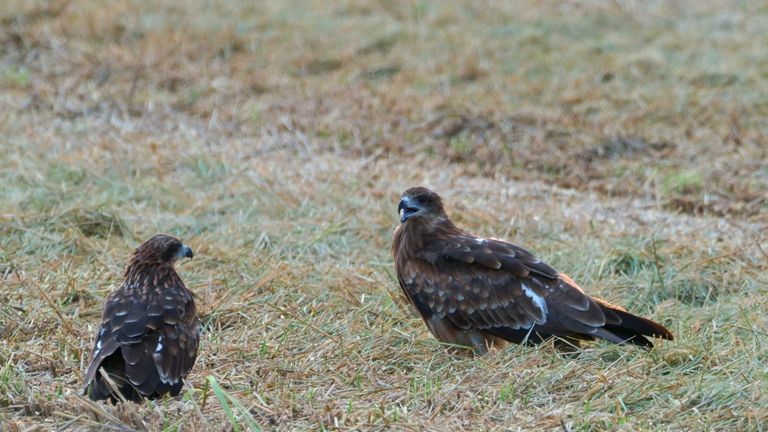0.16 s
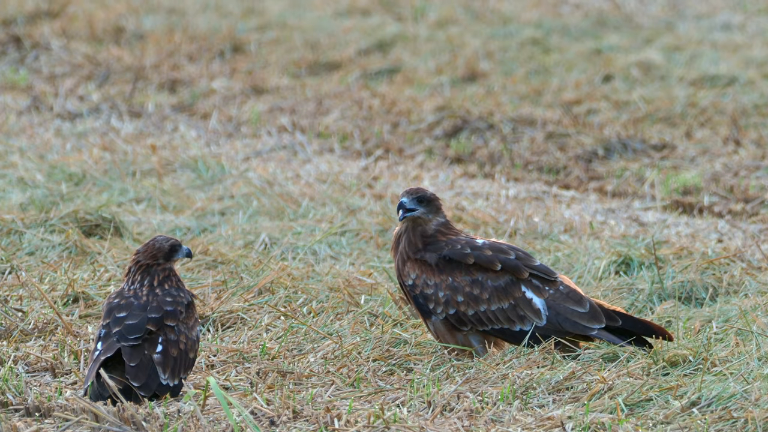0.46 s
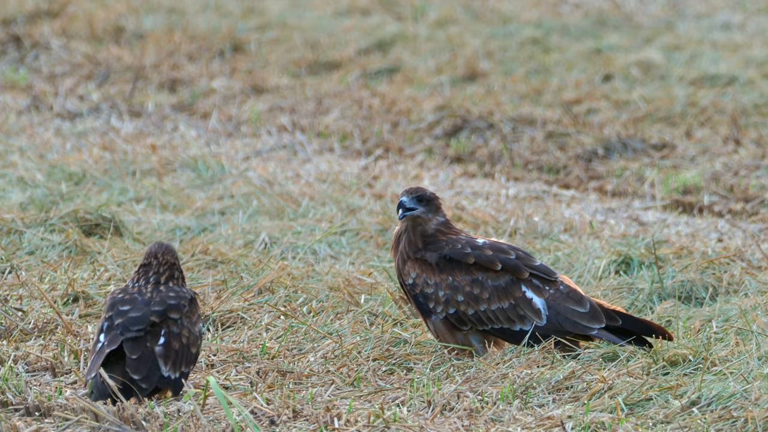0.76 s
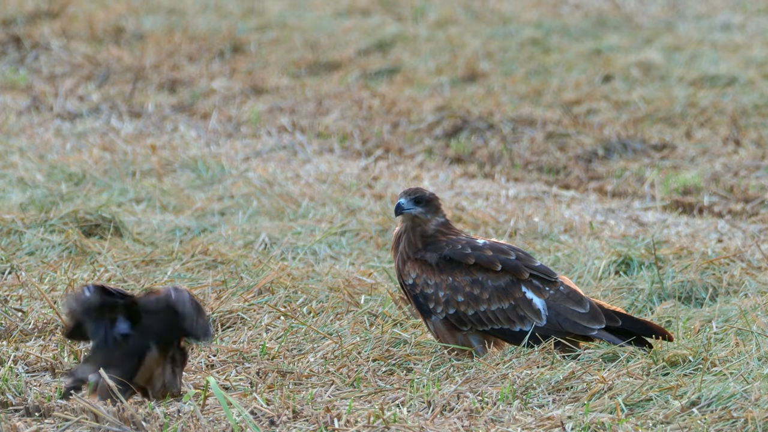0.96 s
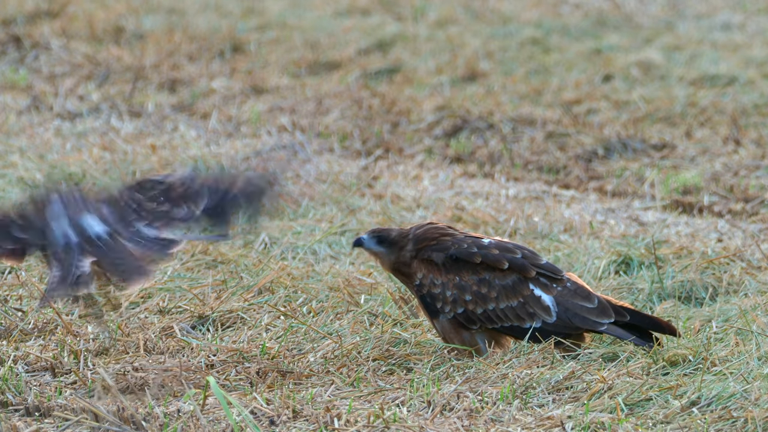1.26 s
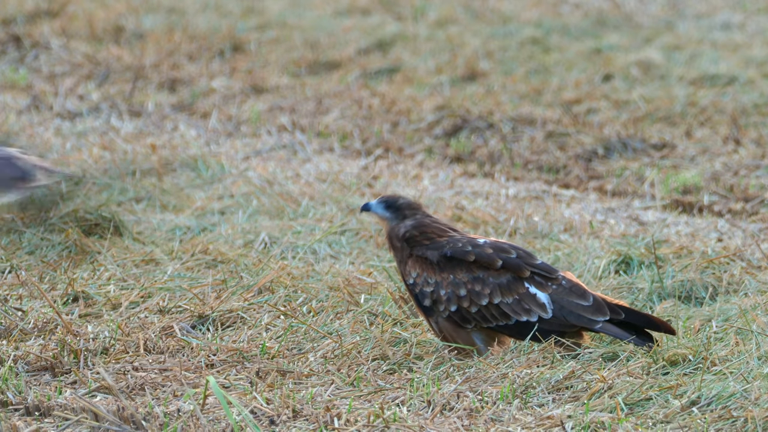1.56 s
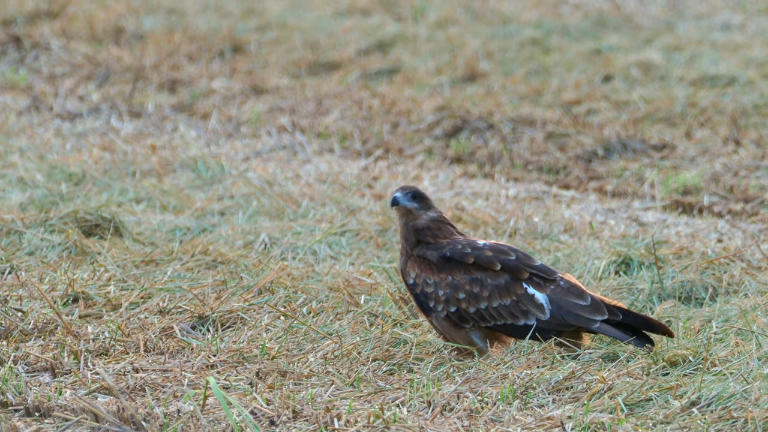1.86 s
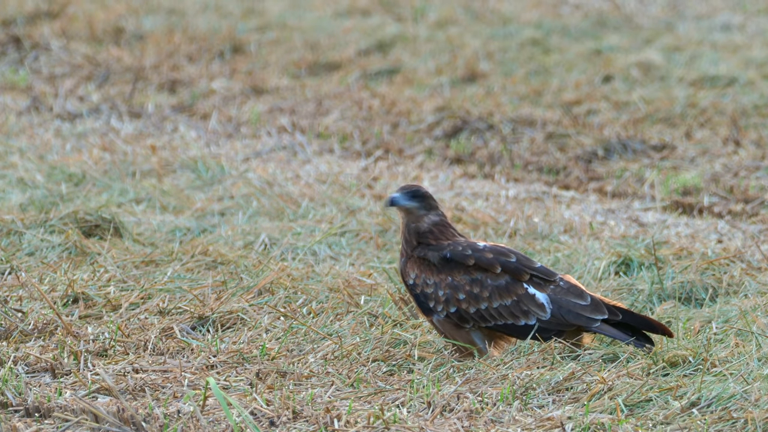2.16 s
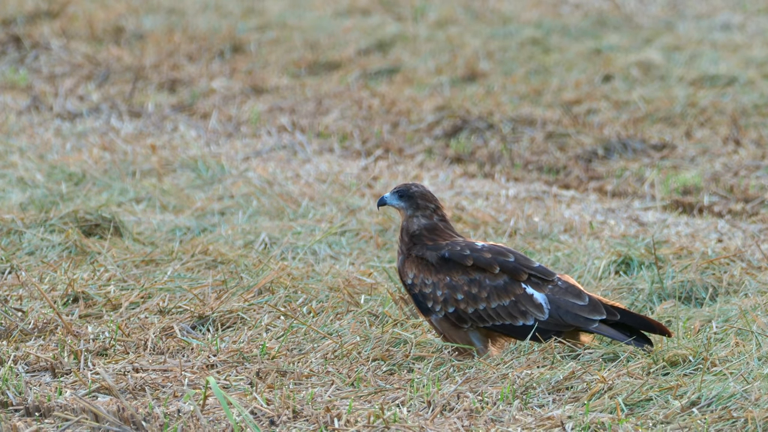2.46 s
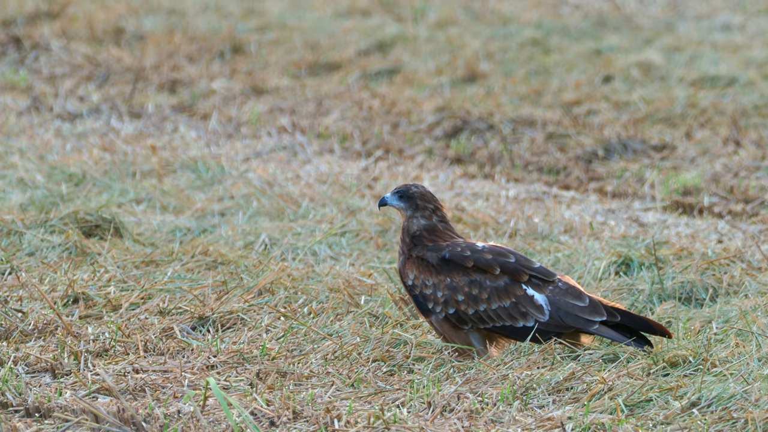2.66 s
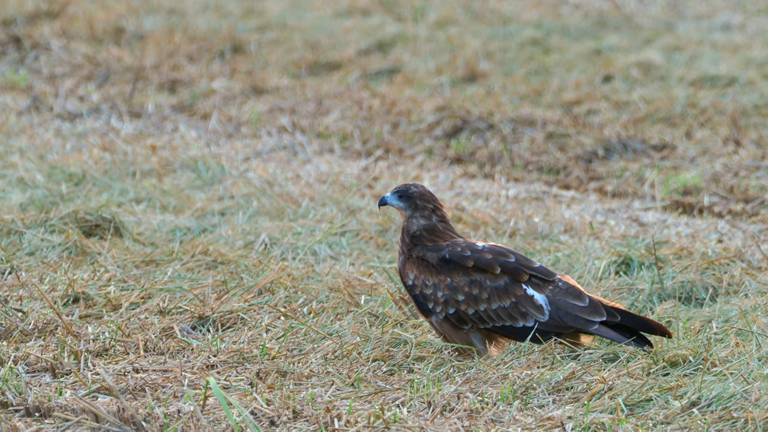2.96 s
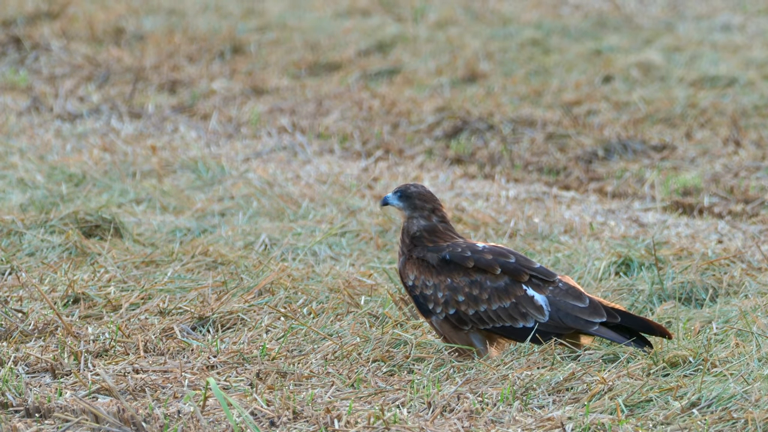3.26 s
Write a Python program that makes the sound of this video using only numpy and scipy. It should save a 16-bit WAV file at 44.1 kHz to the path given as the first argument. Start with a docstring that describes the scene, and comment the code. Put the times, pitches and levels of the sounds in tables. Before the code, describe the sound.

In an open field, a bird of prey in front of the microphone lets out one high, raspy whistle that clears, quavers and fades. Two faraway engines hum beneath it, and a low outdoor rumble continues afterward.

```python
"""A black kite over a mown field

The bird gives one long thin whistle: hoarse at first, then clear, ending in a slow quaver.
The whistle is a few pure tones; the hoarseness is rough, rushing air with a few hollow peaks.
Two far engines drone and drift in pitch over a low outdoor rumble and a faint even hiss."""
import sys
import numpy as np
from scipy import signal
from scipy.fft import rfft, irfft
from scipy.io import wavfile
from scipy.ndimage import uniform_filter1d

SR = 44100
rng = np.random.default_rng(int(sys.argv[2]) if len(sys.argv) > 2 else 0)


def inscribe(sig):
    """Save sig as 16-bit PCM at rate SR to the path in sys.argv[1].

    A 1-D sig is mono; a 2-D sig holds one channel per row.
    Samples are clipped to [-1, 1] before scaling.
    """
    pcm = np.round(np.clip(np.atleast_2d(sig).T, -1, 1) * 32767)
    wavfile.write(sys.argv[1], SR, pcm.astype(np.int16))


N = 150822
TIME = np.arange(N) / SR
FREQUENCIES = np.fft.rfftfreq(N, 1 / SR)
CUTOFF_HZ = 15700


def from_db(db):
    """Turn decibels into a number to multiply a sound by."""
    return 10 ** (np.asarray(db) / 20)


def rms_one(x):
    """Scale a signal so that its average strength (rms) is 1."""
    return x / np.sqrt(np.mean(x ** 2) + 1e-20)


def in_time(rows):
    """Join a table's points in time with straight lines: one curve for each column after the first."""
    times, *columns = np.transpose(rows)
    return [np.interp(TIME, times, column) for column in columns]


def across_frequencies(rows):
    """Join a table's points from bass to treble, giving each octave equal room."""
    hz, values = np.transpose(rows)
    return np.interp(np.log(FREQUENCIES + 1e-9), np.log(hz), values)


def pan(db):
    """Left and right gains: positive dB moves a sound left, negative moves it right."""
    return from_db([[db / 2], [-db / 2]])


def drift(rate):
    """A smooth random wobble of size about 1 that changes about `rate` times a second."""
    return rms_one(irfft(rfft(rng.standard_normal(N)) / (1 + (FREQUENCIES / rate) ** 2), N))


def keep_band(x, hz, width_hz):
    """Keep a band around one frequency, filtering twice for steep sides."""
    r = np.exp(-np.pi * width_hz / SR)
    gain = (1 - r * r) / 2
    stage = [gain, 0, -gain, 1, -2 * r * np.cos(2 * np.pi * hz / SR), r * r]
    return signal.sosfilt([stage, stage], x)


def phase_of(hz):
    """Add up a changing pitch into the angle of a sine wave."""
    return 2 * np.pi * np.cumsum(hz) / SR


# how alike the two ears hear the noise, 1 being the same: (frequency [Hz], likeness [-1 to 1])
EAR_LIKENESS = [(30, .985), (120, 0.97), (300, 0.66), (700, 0.78), (1300, 0.58), (3000, 0.036),
                (5500, -0.014), (15000, -0.055)]
# which side the noise leans to: (frequency [Hz], left minus right [dB])
EAR_BALANCE = [(40, -0.5), (120, -0.8), (330, -2.5), (700, -1), (1400, -1.8), (2600, -0.5), (3900, -2),
               (5000, -2.5), (7500, -0.5), (10000, 1.3), (11500, 1), (13800, -5), (15300, 1.3)]

def wide_noise(colour):
    """Noise from all around: alike in both ears in the bass, unrelated in the treble."""
    shared, opposed = rfft(rng.standard_normal((2, N)))
    alike = across_frequencies(EAR_LIKENESS)
    sides = np.array([[1], [-1]])
    ears = np.sqrt(1 + alike) * shared + np.sqrt(1 - alike) * opposed * sides
    gain = from_db(across_frequencies(colour) + sides * across_frequencies(EAR_BALANCE) / 2)
    in_range = (FREQUENCIES > 10) & (FREQUENCIES < CUTOFF_HZ)
    return rms_one(irfft(ears * gain * in_range, N))


# the tone colour of the low rumble: (frequency [Hz], relative level [dB])
RUMBLE_COLOUR = [(10, -8), (22, 2), (40, -5), (60, -10.5), (90, -10.5), (125, -21), (180, -13), (250, -26),
                 (400, -33), (800, -57)]
# how the rumble swells and sinks: (time [s], level [dB])
RUMBLE_LOUDNESS = [(0, -51), (.3, -47), (.9, -47.5), (1.3, -47.5), (1.85, -48), (2.3, -51.5), (3.42, -51.5)]
# the tone colour of distant traffic and hiss: (frequency [Hz], relative level [dB])
HUSH_COLOUR = [(100, -5.5), (280, 1), (420, -3), (560, -5), (760, -1.5), (930, -10), (1100, -7), (1500, -8),
               (1800, -18.5), (2300, -14.5), (2900, -12.5), (3900, -14.5), (4400, -20), (6200, -18.5),
               (8200, -24), (10200, -20), (11300, -27.5), (13300, -21.5), (14400, -25.5), (15600, -23)]

def open_field(hush_db=-61.5, insect_db=-85.5):
    """Low rumble, the even hush of distant traffic and a faint thin band of insects on the right."""
    rumble_db, = in_time(RUMBLE_LOUDNESS)
    insects = rms_one(keep_band(rng.standard_normal(N), hz=6020, width_hz=110))
    rumble = from_db(rumble_db) * wide_noise(RUMBLE_COLOUR)
    hush = from_db(hush_db) * wide_noise(HUSH_COLOUR)
    return rumble + hush + pan(-11) * from_db(insect_db) * insects


# the nearer engine's note: (time [s], pitch [Hz], level [dB])
NEARER_NOTE = [(0, 224.6, -63), (.46, 220.9, -59.5), (1.1, 212.5, -58.5), (1.79, 204.1, -55),
               (2.2, 205.3, -54.5), (2.55, 206.9, -58), (2.94, 210.1, -54.5), (3.42, 212.3, -54)]
# the tones in its drone: (frequency [times the pitch], relative level [dB])
NEARER_TONES = [(.25, -4), (.5, -10), (1, -1.5), (2, -22)]
# the farther engine's note, which dies away: (time [s], pitch [Hz], level [dB])
FARTHER_NOTE = [(0, 168.1, -69), (.51, 165.1, -58.5), (1.14, 158.7, -57.5), (1.74, 154.5, -58),
                (1.86, 147, -80), (3.42, 143.8, -74)]
# the tones in its drone: (frequency [times the pitch], relative level [dB])
FARTHER_TONES = [(.5, -2.4), (1, -1.4)]

def engine(note, tones, waver_hz, fading_db):
    """A far drone, a little to the right, whose tones swell and fade on their way through the air."""
    hz, level_db = in_time(note)
    phase = phase_of(hz + waver_hz * drift(8))
    drone = np.zeros(N)
    for multiple, db in tones:
        strength = from_db(db + fading_db * drift(13))
        drone += strength * np.sin(multiple * phase + rng.uniform(0, 2 * np.pi))
    return pan(-2.3) * np.sqrt(2) * from_db(level_db) * drone


def from_the_right(x, lag_s=0.00008):
    """Sound from the right reaches the left ear a little late."""
    left, right = x
    delay = np.exp(-2j * np.pi * FREQUENCIES * lag_s)
    return np.array([irfft(rfft(left) * delay, N), right])


# the tone colour of the bird's airy hiss: (frequency [Hz], relative level [dB])
HISS_COLOUR = [(300, -8), (600, -3.5), (1100, -2.5), (2050, -10.5), (2400, -1.5), (2950, 2.5), (4100, -6.5),
               (5500, -6.5), (7400, -4.5), (8300, -10), (10200, -7), (11300, -15.5), (13400, -7),
               (15700, -15)]
# how that hiss fades: (time [s], level [dB])
HISS_LOUDNESS = [(0, -55.5), (.14, -58), (.25, -59), (.35, -62), (.43, -67), (.62, -76), (.8, -84),
                 (1.1, -115)]

def airy_hiss():
    """A bright hiss that opens the call and soon dies."""
    level_db, = in_time(HISS_LOUDNESS)
    return from_db(level_db) * wide_noise(HISS_COLOUR)


# how loud the hoarseness is: (time [s], level [dB])
RASP_LOUDNESS = [(0, -59), (.1, -58.5), (.25, -56), (.34, -59), (.46, -63.5), (.56, -62), (.66, -62.5),
                 (.75, -75.5), (1.05, -78), (1.2, -110)]
# the bands where the hoarse rasp is strongest: (frequency [Hz], width [Hz], relative level [dB])
RASP_BANDS = [(715, 270, -5.5), (1247, 114, -4), (1410, 215, 3.5), (2460, 210, -6.5), (3130, 400, -14)]

def rasp(flutter_db=0.3):
    """Rough, rushing air with a few hollow peaks and a slight flutter."""
    level_db, = in_time(RASP_LOUDNESS)
    rush = rng.standard_normal(N) + 0.11 * rng.standard_normal((2, N))  # nearly alike in both ears
    rush *= from_db(flutter_db * drift(66))
    peaks = sum(from_db(db) * keep_band(rush, hz, width) for hz, width, db in RASP_BANDS)
    return from_db(level_db) * rms_one(peaks)


# the whistle's tune: (time [s], pitch [Hz])
WHISTLE_TUNE = [(0, 1776), (.02, 1830), (.06, 1912), (.13, 1949), (.26, 1929), (.46, 1858), (.645, 1907),
                (.69, 1840), (.74, 1895), (.756, 1839), (.8, 1867), (.868, 1896), (.88, 1803), (.908, 1780),
                (.945, 1908), (.957, 1795), (.982, 1782), (1.018, 1894), (1.1, 1823), (1.17, 1780)]
# how hard the bird whistles: (time [s], level [dB])
WHISTLE_EFFORT = [(0, -68), (.05, -59), (.14, -57.5), (.26, -62), (.34, -60), (.46, -61.5), (.63, -64.5),
                  (.69, -63), (.85, -63), (.97, -66), (1.04, -67), (1.1, -78), (1.17, -94), (1.21, -115)]
# the tones at 1, 2, 3 and 4 times the pitch: (relative level [dB], share of the effort's swing [0 to 1],
# left minus right [dB], gain as the pitch rises [dB per 100 Hz])
WHISTLE_TONES = [(-8, 0.36, -2.5, 3.5), (1, 0.95, -2.5, -1.5), (-19, 0.23, -11.5, 9), (-23, 0.9, 14, 4)]
# the extra tones of the split voice, at 0.5, 1.5 and 2.5 times the pitch: (level [dB])
SPLIT_TONES = [-69.5, -60, -82]

def whistle(usual_effort_db=-61.5, shimmer_db=1.0, split_at_s=0.16, split_width_s=0.084, flicker_db=2.0):
    """A nearly pure voice led by its second tone; it splits early on and brightens atop each quaver."""
    pitch, = in_time(WHISTLE_TUNE)
    effort_db, = in_time(WHISTLE_EFFORT)
    tremble = 1 + 0.0019 * drift(84)
    phase = phase_of(uniform_filter1d(pitch, size=300) * tremble)
    rise_hz = np.minimum(pitch - 1870, 20)  # the voice stops brightening at 1890 Hz
    voice = np.zeros((2, N))
    for multiple, (db, share, pan_db, db_per_100_hz) in enumerate(WHISTLE_TONES, 1):
        level_db = usual_effort_db + db + share * (effort_db - usual_effort_db)
        level_db += db_per_100_hz * rise_hz / 100
        level_db += shimmer_db * drift(27)
        voice += pan(pan_db) * from_db(level_db) * np.sin(multiple * phase)
    split = np.exp(-0.5 * ((TIME - split_at_s) / split_width_s) ** 2)  # a brief bell-shaped swell
    for k, db in enumerate(SPLIT_TONES):
        voice += split * from_db(db + flicker_db * drift(25)) * np.sin((k + 0.5) * phase)
    end_s = WHISTLE_EFFORT[-1][0]
    return np.sqrt(2) * voice * (TIME < end_s)


# echoes from the field's edge: (delay [s], left level [dB], right level [dB])
EDGE_ECHOES = [(.019, -26, -31), (.043, -25, -33)]

def field_echoes(call, tail_db=-15.5, tail_s=0.44):
    """The call arrives directly, then as two echoes and a faint scattered tail."""
    heard = call.copy()
    for delay_s, left_db, right_db in EDGE_ECHOES:
        echo = np.interp(TIME - delay_s, TIME, call.mean(axis=0), left=0)
        heard += from_db([[left_db], [right_db]]) * echo
    scatter = rng.standard_normal((2, SR)) * from_db(-60 * TIME[:SR] / tail_s)
    tail = signal.fftconvolve(call, rms_one(scatter) / np.sqrt(SR), axes=1)[:, :N]
    return heard + from_db(tail_db) * tail


def scene():
    """The kite is straight ahead; the engines and rumble lie a little to the right."""
    nearer = engine(NEARER_NOTE, NEARER_TONES, waver_hz=0.43, fading_db=0.5)
    farther = engine(FARTHER_NOTE, FARTHER_TONES, waver_hz=2.5, fading_db=2.0)
    kite = field_echoes(whistle() + rasp() + airy_hiss())
    return from_the_right(open_field() + nearer + farther) + kite


def record(dry):
    """Cut off the very highest treble steeply."""
    treble_cut = signal.ellip(10, 0.05, 60, CUTOFF_HZ, fs=SR, output="sos")
    return signal.sosfiltfilt(treble_cut, dry)


dry = scene()
out = record(dry)
inscribe(out)
```